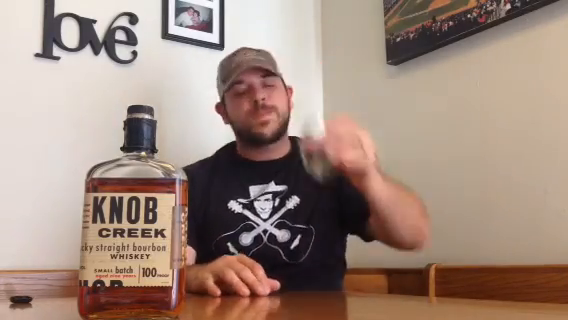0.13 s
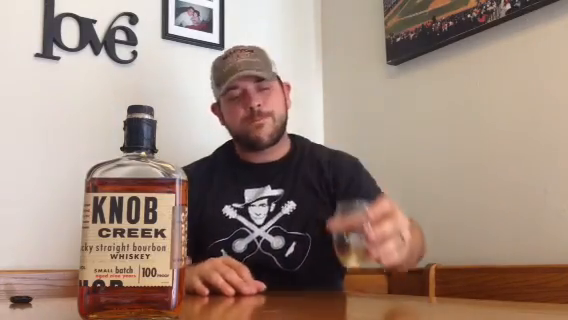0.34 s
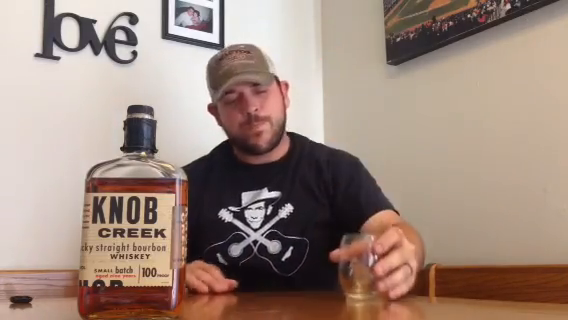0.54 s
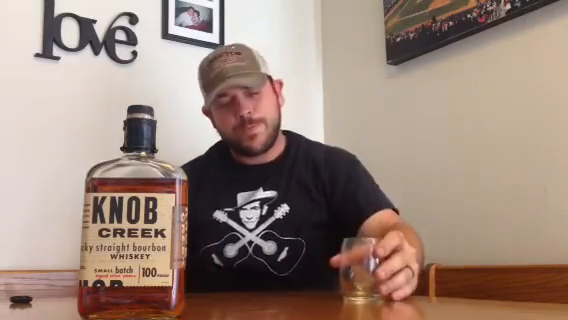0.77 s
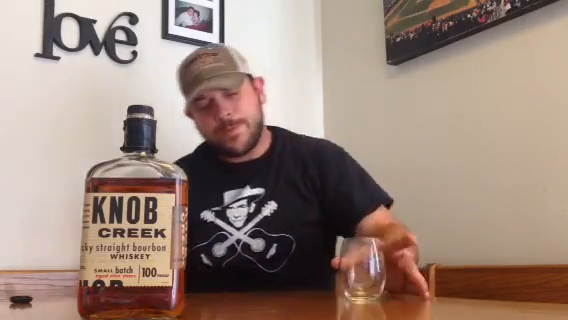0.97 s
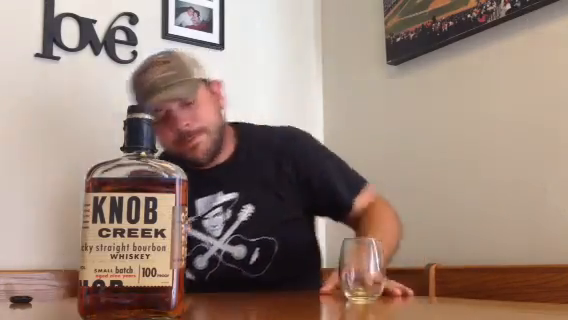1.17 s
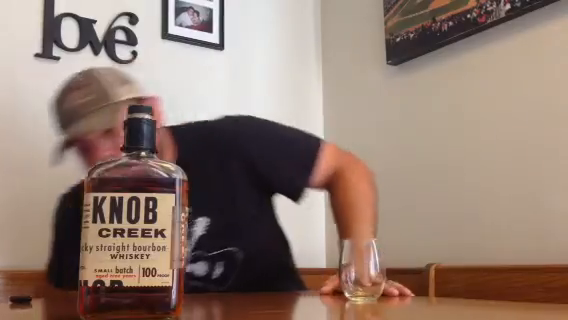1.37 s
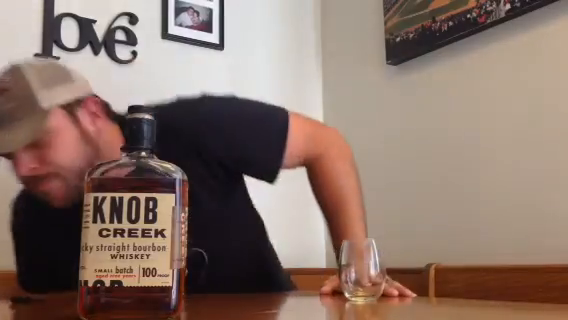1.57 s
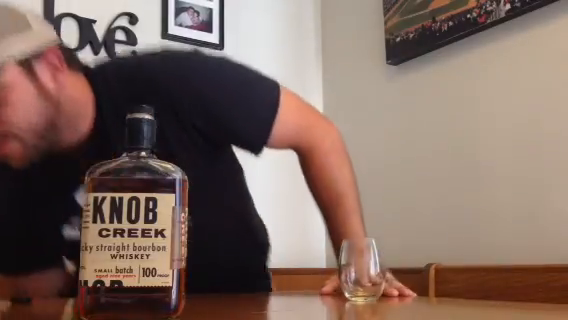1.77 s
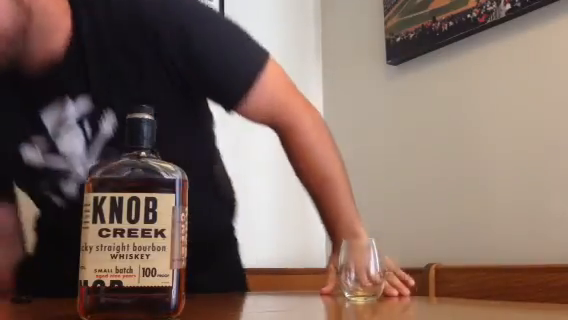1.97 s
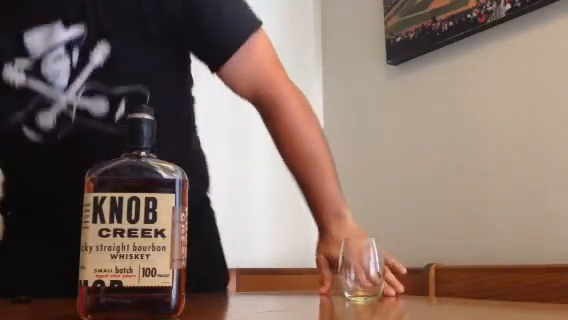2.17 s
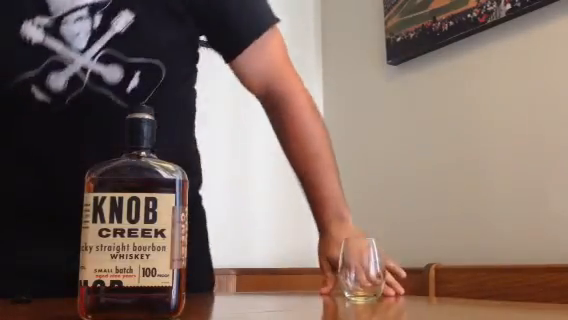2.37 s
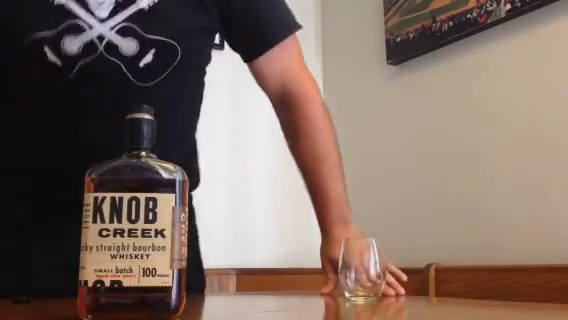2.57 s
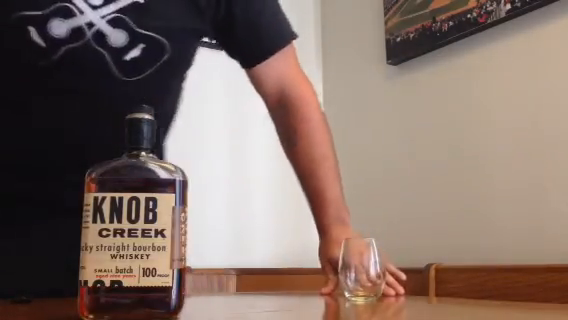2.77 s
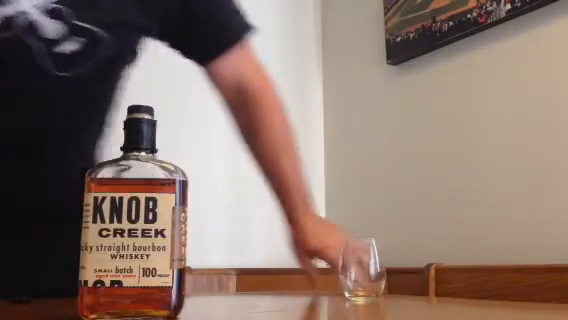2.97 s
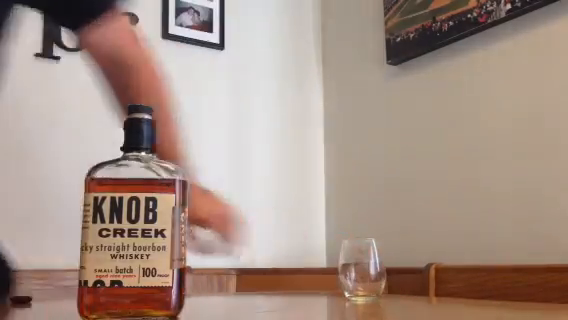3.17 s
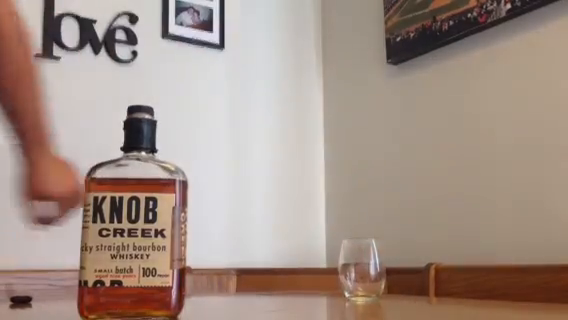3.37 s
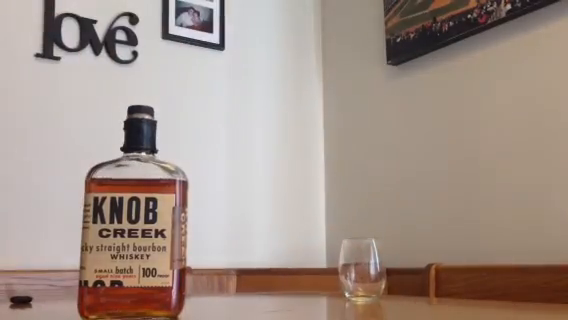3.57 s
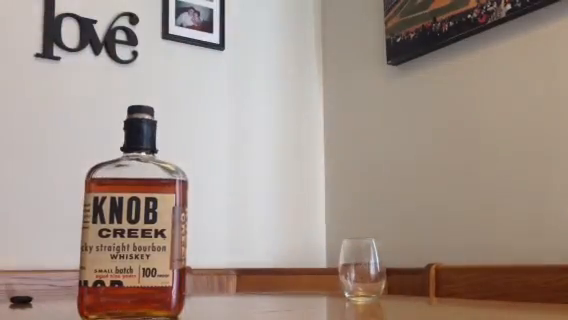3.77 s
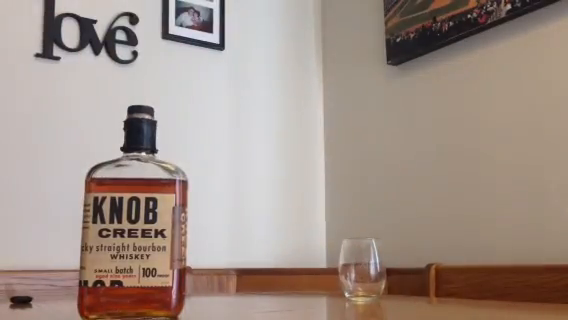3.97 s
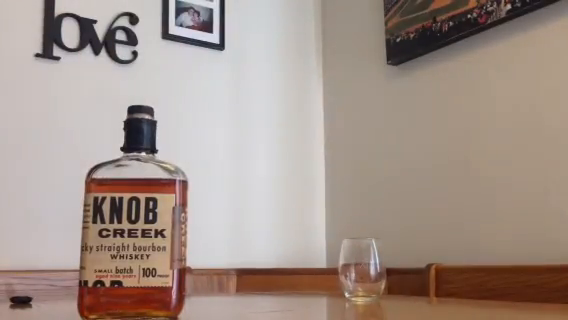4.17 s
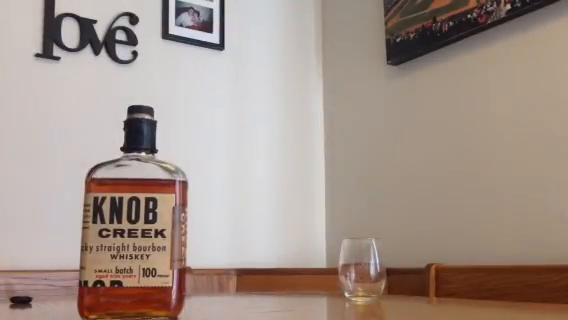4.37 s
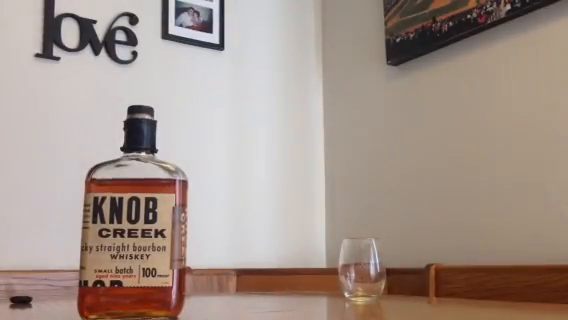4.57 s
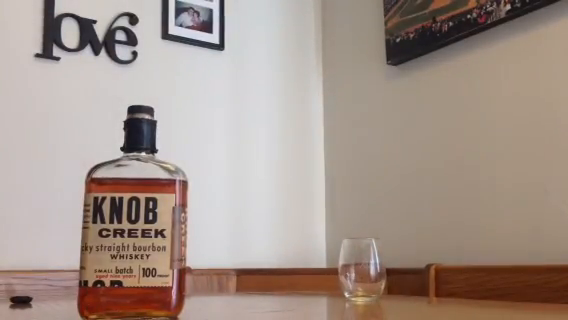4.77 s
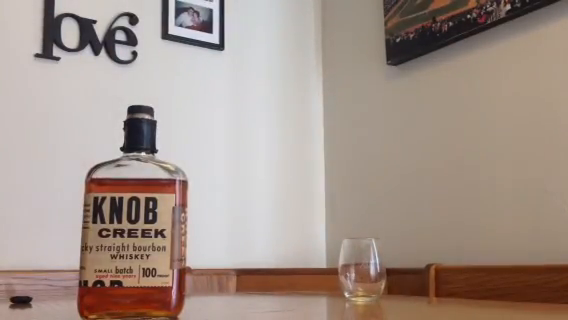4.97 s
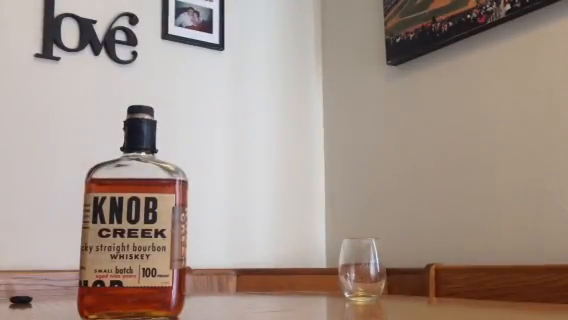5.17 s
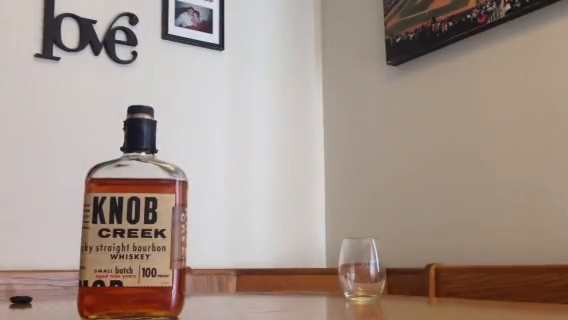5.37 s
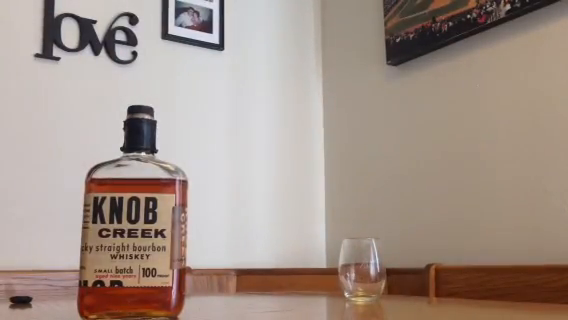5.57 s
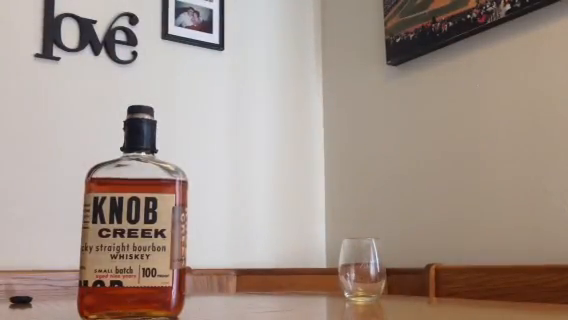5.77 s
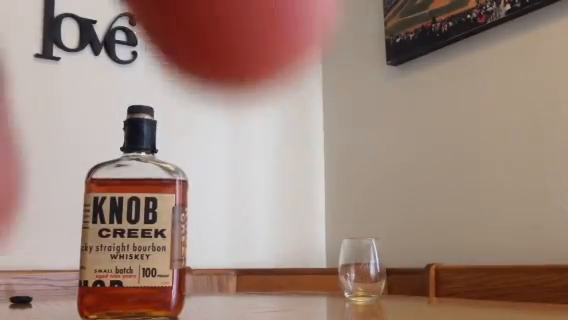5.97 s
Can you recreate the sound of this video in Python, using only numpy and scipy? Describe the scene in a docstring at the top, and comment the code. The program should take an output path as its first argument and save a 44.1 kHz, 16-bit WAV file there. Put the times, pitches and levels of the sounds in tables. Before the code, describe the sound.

A quiet, bare indoor room with steady low murmur and slight hiss, captured by one nearby microphone with short reflections. Almost nothing happens at first beyond a faint tick near 0.2 s and barely audible rubbing at 0.4 s. At 0.72 s a small glass is set hard on a wooden table: a loud, sharp, woody knock with a tiny rocking second contact within 20 ms, dying quickly. At 1.3 s a seat joint cracks, dry and snappy, followed by soft low thumps through 1.9 s with light cloth scuffs and ticks. A heavier, dull double thud lands around 2.3 s, with small clicks near 2.75 s. From 3.2 to 3.4 s come thumps, rustle and a very crisp, bright tap. Sparse faint bumps follow, with a clearer thud and tap at 4.5 s, a soft footfall at 5.1 s, and weak muffled thumps until about 5.7 s, leaving only room murmur.

```python
"""A quiet, bare room with a wooden table: a small glass is set down hard, the sitter leans over, the seat cracks,
and he stands up and walks off. Glass and crack are pushes that ring the modes of table top and seat frame.
Thumps through the floor, ticks and taps, and scuffs of cloth and soles are bursts of grainy, band-limited noise.
One microphone hears them direct and reflected, with a low floor hum, over a steady room murmur and its own hiss."""
import sys
import numpy as np
from scipy import signal
from scipy.io import wavfile

SR = 44100
rng = np.random.default_rng(int(sys.argv[2]) if len(sys.argv) > 2 else 0)


def waveform_to_disk(signal):
    """Save audio, clipped to [-1, 1], as 16-bit WAV at the path in sys.argv[1]."""
    frames = np.transpose(np.atleast_2d(signal))
    scaled = np.clip(frames, -1, 1) * 32767
    samples = np.round(scaled).astype(np.int16)
    wavfile.write(sys.argv[1], SR, samples)


N = 265437  # length in samples

# Noise of room and microphone. Each row: frequency in Hz, relative spectrum level in dB.
MURMUR_SPECTRUM = [(15, -42), (25, -15), (122, -4), (280, -12), (357, -3), (479, -8), (644, -7),
                   (698, -13.5), (777, -12), (1290, -6.5), (1400, -17), (1690, -14.5), (2460, -17),
                   (15300, -24)]
# Decay of the bare room. Each row: frequency in Hz, t60 in seconds.
ROOM_DECAY = [(100, 0.55), (300, 0.42), (1000, 0.55), (2500, .35), (6000, 0.55), (14000, 0.095)]
# Reflected share of each source, by distance from the microphone: source name, level in dB against the direct sound.
REFLECTED_DB = dict(glass=-10.5, seat=-11.5, thumps=-10, taps=-8.5, scuffs=-15)
# A low floor tone hums at three moments and dies slowly. Each row: start in seconds, level in dB.
FLOOR_HUMS = [(1.448, -57), (2.35, -63.5), (3.401, -61)]
# Whole-body weight shifts shake the floor. Each row: start in seconds, level in dB.
WEIGHT_SHIFTS = [(1.43, -57), (2.29, -45), (3.32, -46), (4.52, -49.5), (5.12, -51)]
# Weight landing on floor and seat. Each row: start in seconds, level in dB, pitch in Hz, spread in octaves,
# contact length in seconds.
THUMP_EVENTS = [(1.0, -53.5, 177.5, 1.5, 0.03), (1.235, -40.5, 144, 0.65, 0.034),
                (1.34, -40, 141, 1.2, .013), (1.41, -37.5, 140, 1.94, 0.04),
                (1.475, -40.5, 280, 1.17, 0.021), (1.768, -35.5, 144, .95, 0.026),
                (1.835, -37, 165, 1.55, 0.03), (1.92, -47.5, 148, 2.7, 0.028),
                (2.04, -54, 135, 1.03, 0.089), (2.16, -50, 152, 0.87, 0.037), (2.29, -28, 103, 1.2, 0.0056),
                (2.311, -25, 109, 0.92, 0.005), (2.35, -35.5, 111, 1.5, 0.01),
                (2.6, -47.5, 161, 0.87, 0.017), (3.14, -48, 135, 2.15, 0.013), (3.188, -41, 101, 1.9, .004),
                (3.24, -50, 99, 2.6, 0.095), (3.325, -30.5, 196, 1.34, 0.023),
                (3.41, -40.5, 243, 1.85, 0.023), (3.598, -50, 326, .7, 0.029), (3.82, -57, 433, .45, 0.017),
                (4.1, -52.5, 276, 1.2, 0.027), (4.36, -60.5, 240, 2, 0.12), (4.52, -43.5, 376, 0.92, 0.03),
                (4.54, -35, 193, .7, .015), (4.826, -51, 135, 1.35, 0.018), (5.12, -39.5, 158, 1.3, 0.044),
                (5.2, -43.5, 113, 1, 0.02), (5.52, -60.5, 146, 1.4, 0.14), (5.71, -49.5, 412, 0.52, 0.045),
                (5.72, -57, 157, 1.55, 0.067)]
# Cloth and soles rubbing. Each row: start in seconds, level in dB, pitch in Hz, contact length in seconds.
SCUFF_EVENTS = [(.42, -63.5, 744, 0.1), (.988, -53.5, 3970, 0.029), (1.42, -57.5, 3100, 0.059),
                (1.8, -51, 760, 0.095), (1.89, -53.5, 5600, 0.03), (2.12, -53, 940, .06),
                (2.158, -53, 4530, 0.02), (2.3, -51, 6740, 0.065), (2.37, -46, 1480, 0.029),
                (2.775, -50.5, 8000, 0.034), (3.135, -54.5, 2610, 0.028), (3.235, -47.5, 1390, 0.018),
                (3.28, -52.5, 2960, 0.09), (3.33, -53, 6700, 0.02), (3.47, -59, 6940, 0.14),
                (3.58, -54, 1366, 0.067), (4.36, -61, 4070, 0.087), (4.475, -50.5, 770, 0.074),
                (4.82, -54.5, 1845, 0.038), (5.25, -56, 1680, 0.038), (5.53, -55, 4780, .075)]
# Ticks and taps. Each row: start in seconds, level in dB, pitch in Hz, spread in octaves, contact length in seconds.
TAP_EVENTS = [(.176, -52.5, 1630, 0.52, 0.0034), (1.299, -42.5, 3020, 0.32, 0.016),
              (1.2995, -51.5, 6000, .8, .001), (1.838, -40.5, 1740, .55, 0.0027),
              (1.897, -43, 2900, 2.1, 0.004), (2.296, -31, 448, 2.02, 0.011),
              (2.318, -33, 445, 1.76, 0.026), (2.37, -40, 3100, 0.88, 0.0066),
              (2.625, -55, 610, 0.29, .008), (2.748, -46, 2760, 1.3, 0.0013),
              (2.772, -43, 9500, 0.53, 0.0063), (2.774, -46, 2050, 3.2, 0.013),
              (3.23, -38, 1670, 1, 0.0021), (3.32, -31, 3800, 0.8, 0.0082),
              (3.324, -36.5, 1070, 1.9, 0.033), (3.405, -23.5, 1280, 2.8, 0.00032),
              (3.4052, -37.5, 8400, 0.76, 0.00079), (4.098, -49.5, 4120, 0.75, 0.016),
              (4.101, -52.5, 1450, .85, 0.026), (4.105, -43.5, 656, 0.24, 0.0042),
              (4.16, -57, 656, 0.17, 0.011), (4.522, -36.5, 2400, 1.95, 0.018),
              (4.524, -45.5, 1324, 0.15, 0.021), (4.55, -33, 920, 0.85, 0.0017),
              (4.833, -54, 2540, 0.22, 0.043), (5.14, -51, 3140, 1.34, 0.035)]
# Noise of the glass's first touch: a low thud, a midrange clatter and a bright click.
# Each row: pitch in Hz, level in dB, spread in octaves, contact length in seconds.
TOUCH_NOISE_BANDS = [(136, -39.5, 1.8, .04), (2140, -30, 0.4, 0.021), (4170, -44.5, .75, 0.0095),
                     (8700, -47, 1.8, 0.0004)]
# The seat joint cracks. Each row: start in seconds, push strength in dB, contact brightness in Hz.
CRACK_BLOWS = [(1.2982, -25, 2820), (1.2992, -7, 2700), (1.3021, -18, 2000)]
# Modes of the seat frame. Each row: frequency in Hz, relative level in dB, t60 in seconds.
SEAT_MODES = [(384, -22, 0.048), (526, -16.5, 0.086), (686, -22, 0.0646), (825, -19.5, 0.066),
              (946, -18.5, 0.1), (1057, -20.5, 0.071), (1426, -7.5, 0.031), (1545, -8, 0.05),
              (1775, -5, 0.023), (1960, -3.5, 0.01), (2436, -6.5, 0.023), (2830, -42, 0.038)]
# Glass base on the table top, first touch and rocking. Each row: start in seconds, push strength in dB,
# contact brightness in Hz.
GLASS_BLOWS = [(0.7183, -7.5, 2249), (0.7232, -27.5, 1194), (0.728, -17.5, 1505), (0.7365, -6, 673)]
# Modes of the table top. Each row: frequency in Hz, relative level in dB, t60 in seconds.
TABLE_MODES = [(157, -31, 0.17), (259.5, -13.5, 0.12), (308.9, -18, 0.084), (398.7, -12, 0.25),
               (535, -12.5, 0.068), (538.5, -13, 0.075), (587, -17, 0.0816), (870, -21.5, 0.22),
               (687, -20.5, 0.14), (788, -11, 0.073), (950, -20, .1), (994, -29, 0.37), (1104, -12, 0.033),
               (1189, -12.5, 0.18), (1270, -18.5, .06), (1434, -22.5, 0.26), (1460, 7, 0.00906),
               (1520, -17, 0.13), (1633, -25, 0.31), (1988, -14, 0.027), (2270, -15, 0.022),
               (2510, -16.5, 0.0313), (2727, -32.5, .03)]
# Envelopes by kind of contact: rise as a share of contact length, shortest t60 in seconds,
# t60 added per second of contact; scuffs also share one spread in octaves.
THUMP_SHAPE = dict(rise_share=0.17, die_s=0.025, die_per_length=3.9)
TAP_SHAPE = dict(rise_share=.15, die_s=0.0053, die_per_length=6.1)
SCUFF_SHAPE = dict(octaves=2.8, rise_share=.3, die_s=0.23, die_per_length=2.5)

MURMUR_DB = -63.5  # RMS level
FIRST_ECHO_S = 0.0012
FLOOR_HZ, FLOOR_T60_S, FLOOR_RISE_S = 129, 2.3, 0.04
SHIFT_HZ, SHIFT_OCTAVES, SHIFT_S = 47, 1.9, 0.038
MIC_DIP_HZ, MIC_DIP_WIDTH_HZ, MIC_DIP_SHARE = 2750, 780, 0.32
CUTOFF_HZ = 15300


def from_db(db):
    """Decibels to gain."""
    return 10 ** (np.asarray(db) / 20)


def at_hz(points, hz):
    """Read a (Hz, value) table on a log-frequency axis."""
    table_hz, values = np.array(points).T
    return np.interp(np.log(hz), np.log(table_hz), values)


def bands(size):
    """Half-octave bands of white noise with their centres; neighbours come from unrelated noises."""
    edges = 25 * 2 ** np.arange(0, 9.6, 0.5)
    white = rng.standard_normal((2, size))
    for k, (low, high) in enumerate(zip(edges, edges[1:])):
        sos = signal.butter(2, [low, high], "band", fs=SR, output="sos")
        yield np.sqrt(low * high), signal.sosfilt(sos, white[k % 2])


def murmur():
    """Steady noise of the room and the microphone, summed from weighted bands."""
    out = sum(from_db(at_hz(MURMUR_SPECTRUM, hz)) * band for hz, band in bands(N))
    return from_db(MURMUR_DB) * out / out.std()


def room(x):
    """Dense reflections: noise that builds after the first echo and dies band by band."""
    t = np.arange(SR * 3 // 4) / SR
    tail = sum(band * from_db(-60 * t / at_hz(ROOM_DECAY, hz)) for hz, band in bands(len(t)))
    tail *= np.clip(t / FIRST_ECHO_S - 1, 0, 1)
    tail /= np.sqrt(np.sum(tail ** 2))
    return signal.fftconvolve(x, tail)[:N]


def floor_hum():
    """A low floor tone that swells briefly and dies slowly."""
    out = np.zeros(N)
    for start, level_db in FLOOR_HUMS:
        t = np.arange(N) / SR - start
        swell = np.clip(t / FLOOR_RISE_S, 0, 1)
        out += from_db(level_db - 60 * t / FLOOR_T60_S) * swell * np.sin(2 * np.pi * FLOOR_HZ * t)
    return out


def contacts(rows, rise_share, die_s, die_per_length, octaves=None):
    """Longer contacts swell more slowly and die more slowly; the band spreads around the pitch."""
    for start, level_db, hz, *spread, length in rows:
        half = 2 ** ((octaves or spread[0]) / 2)
        rise, t60 = rise_share * length, die_s + die_per_length * length
        yield start, level_db, hz / half, hz * half, rise, length, t60


def bursts(rows, grain_db, dull_hz, order, lump_db=1.0, slips_per_s=150):
    """Grainy contact noise that swells, holds and dies, heard through the band in which the body rings."""
    out, t = np.zeros(N + SR), np.arange(SR) / SR
    for start, level_db, low_hz, high_hz, rise, hold, t60 in rows:
        white, sizes = rng.standard_normal(SR), rng.exponential(1, SR)
        slips = rng.standard_normal(400)
        swell = np.sin(np.pi / 2 * np.minimum(t / max(rise, 1e-4), 1)) ** 2
        decay = from_db(-60 * np.maximum(t - rise - hold, 0) / max(t60, 1e-3))
        shape = swell * decay + 1e-12
        # the contact sticks and slips
        lumps = np.interp(t, np.arange(len(slips)) / slips_per_s, slips)
        grains = white * from_db(grain_db * np.minimum(sizes, 5) + lump_db * lumps)
        band = signal.butter(order, [low_hz, min(high_hz, 0.45 * SR)], "band", fs=SR, output="sos")
        tone = signal.sosfilt(band, shape * grains)
        # soft contacts favour the lows
        tone = signal.lfilter(*signal.butter(1, dull_hz, fs=SR), tone)
        # the energy of a contact follows its strength and length, whatever the grains
        even = np.sqrt(np.sum(shape ** 2) / np.sum(tone ** 2)) / 2
        at = round(start * SR)
        out[at:at + SR] += from_db(level_db) * even * tone
    return out[:N]


def scuffs():
    """Cloth and soles rub: noise in one wide band around each pitch."""
    return bursts(contacts(SCUFF_EVENTS, **SCUFF_SHAPE), grain_db=2.0, dull_hz=3775, order=2)


def thumps():
    """Weight lands on floor and seat, and shifts of the body shake the floor: dull low noise."""
    shifts = [(start, db, SHIFT_HZ, SHIFT_OCTAVES, SHIFT_S) for start, db in WEIGHT_SHIFTS]
    rows = contacts(THUMP_EVENTS + shifts, **THUMP_SHAPE)
    return bursts(rows, grain_db=-2.5, dull_hz=909.3, order=3)


def taps():
    """Ticks and taps, with the noise of the glass's first touch on the table, as short bursts."""
    touch_s = GLASS_BLOWS[0][0]
    touch = [(touch_s, db, hz, spread, length) for hz, db, spread, length in TOUCH_NOISE_BANDS]
    return bursts(contacts(TAP_EVENTS + touch, **TAP_SHAPE), grain_db=3.0, dull_hz=3616, order=2)


def struck(blows, modes):
    """Each blow is a rounded push that sets every mode ringing; the lowest motion does not radiate."""
    push = np.full(SR, 1e-18)
    start = round(blows[0][0] * SR) - 10
    out = np.zeros(N)
    for blow_s, strength_db, bright_hz in blows:
        click = np.zeros(SR)
        click[round(blow_s * SR) - start] = from_db(strength_db)
        push += signal.sosfilt(signal.butter(3, bright_hz, fs=SR, output="sos"), click)
    push = signal.sosfilt(signal.butter(2, 150, "high", fs=SR, output="sos"), push)
    for k, (hz, level_db, t60) in enumerate(modes):
        # a two-pole resonator; successive modes alternate in sign
        radius, angle = from_db(-60 / (t60 * SR)), 2 * np.pi * hz / SR
        gain = np.sin(angle) * from_db(level_db) * (-1) ** k
        poles = [1, -2 * radius * np.cos(angle), radius ** 2]
        out[start:start + SR] += signal.lfilter([0, gain], poles, push)
    return out


def seat_crack():
    """The cracking joint gives the seat frame a few quick pushes and its modes ring."""
    return struck(CRACK_BLOWS, SEAT_MODES)


def glass_on_table():
    """The glass base touches down and rocks, ringing the modes of the table top."""
    return struck(GLASS_BLOWS, TABLE_MODES)


def scene():
    """Direct sound of every source, its reflections, the floor hum and the murmur."""
    near = dict(scuffs=scuffs(), thumps=thumps(), taps=taps(), seat=seat_crack(), glass=glass_on_table())
    far = room(sum(from_db(REFLECTED_DB[name]) * sound for name, sound in near.items()))
    return (murmur() + floor_hum() + far + sum(near.values()))[None]


def record(dry):
    """The microphone housing cancels part of a narrow band; the top is cut steeply."""
    b, a = signal.iirpeak(MIC_DIP_HZ, MIC_DIP_HZ / MIC_DIP_WIDTH_HZ, fs=SR)
    heard = dry - MIC_DIP_SHARE * signal.lfilter(b, a, dry)
    # order 14, 0.3 dB passband ripple, 60 dB stopband
    return signal.sosfilt(signal.ellip(14, 0.3, 60, CUTOFF_HZ, fs=SR, output="sos"), heard)


dry = scene()
out = record(dry)
waveform_to_disk(out)
```